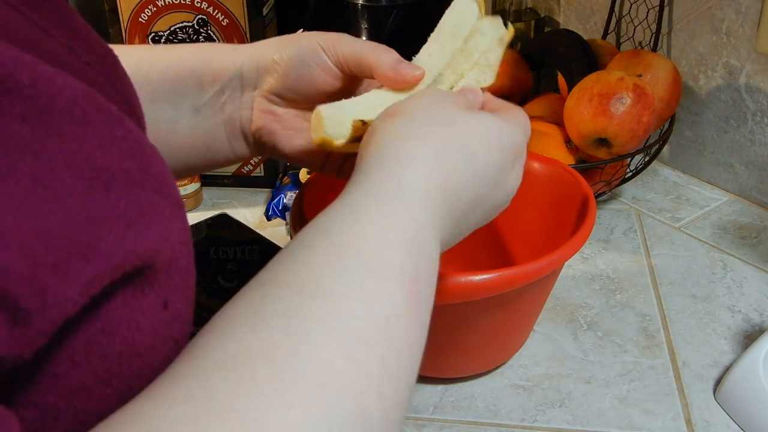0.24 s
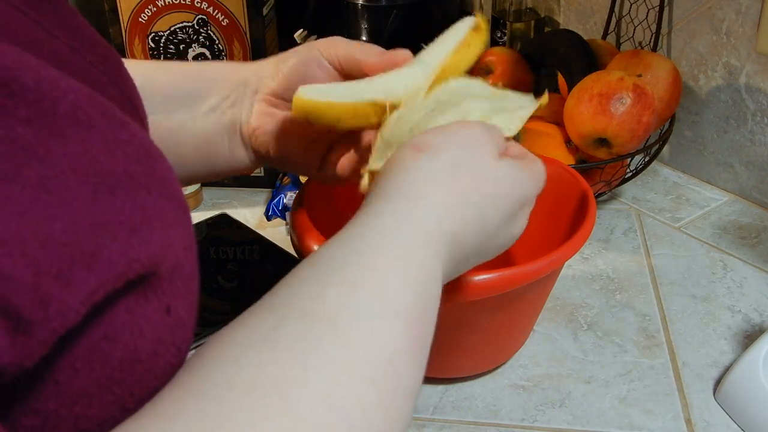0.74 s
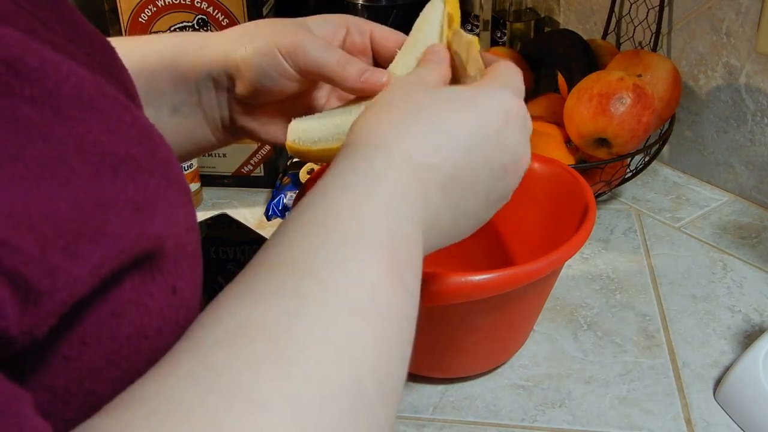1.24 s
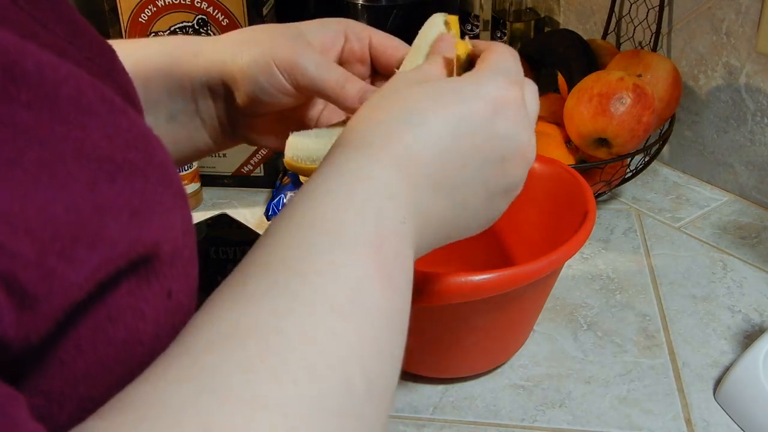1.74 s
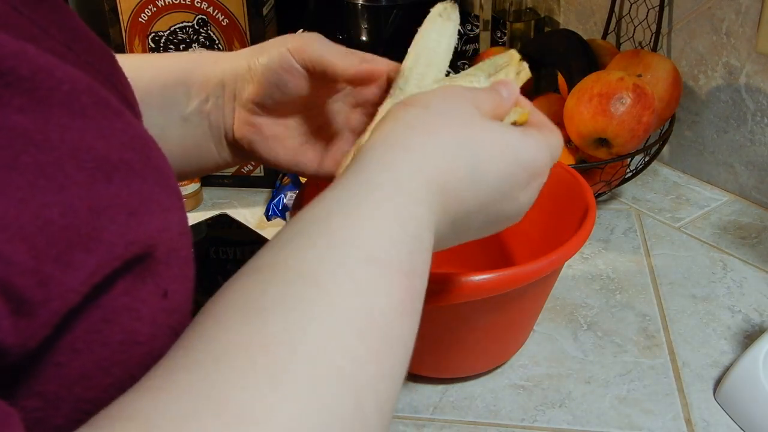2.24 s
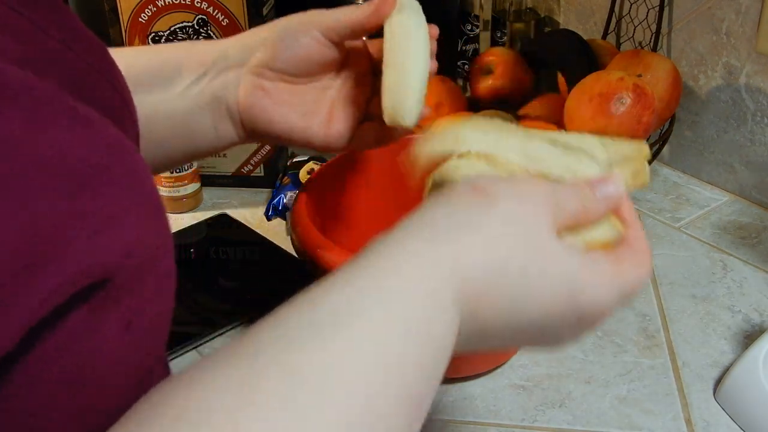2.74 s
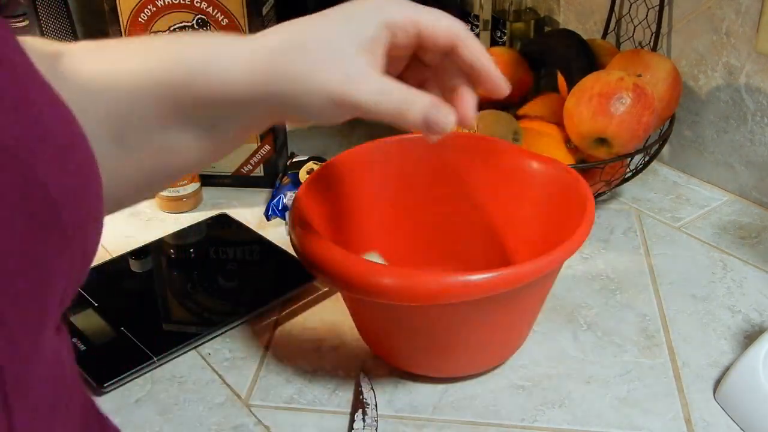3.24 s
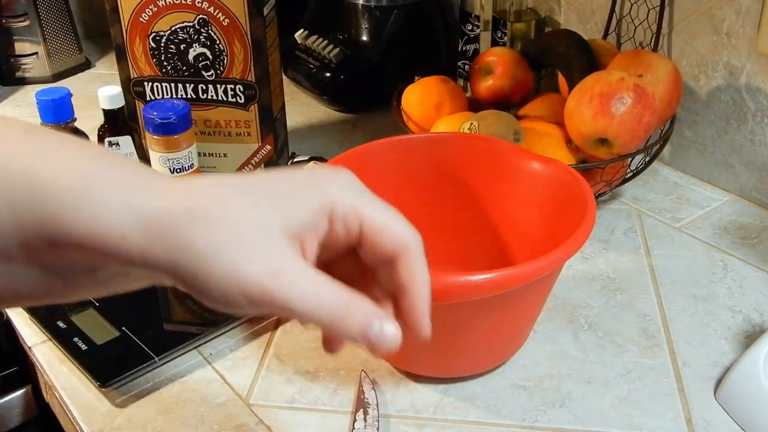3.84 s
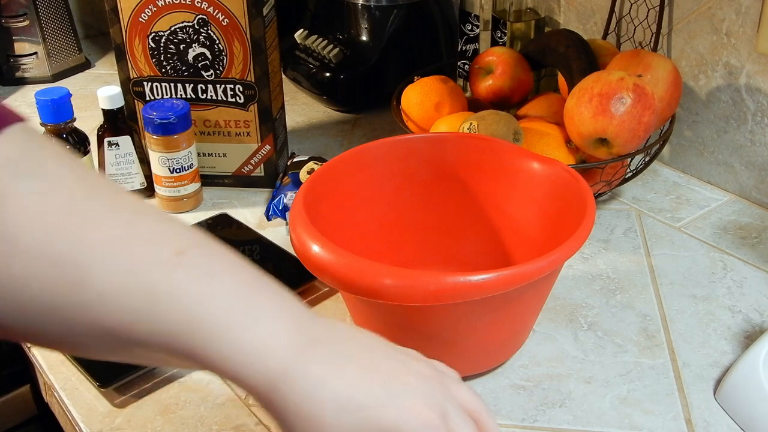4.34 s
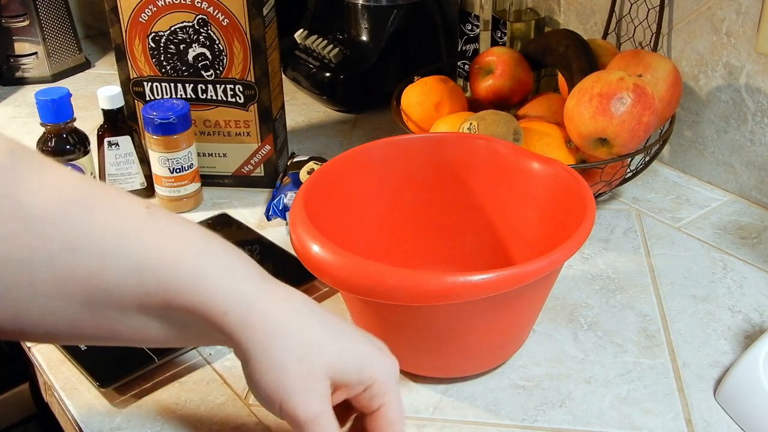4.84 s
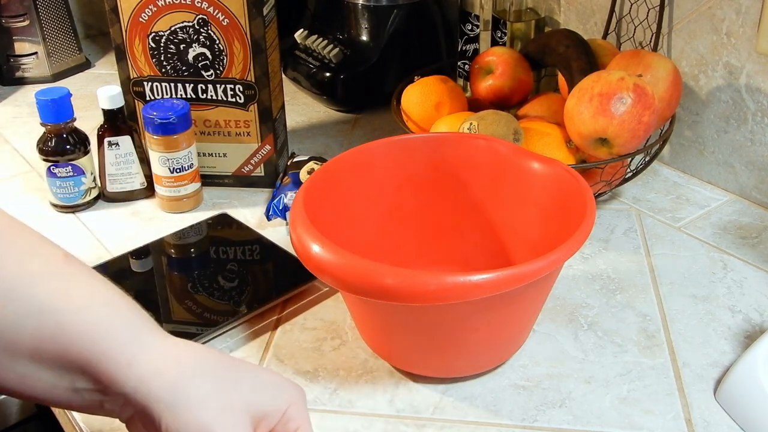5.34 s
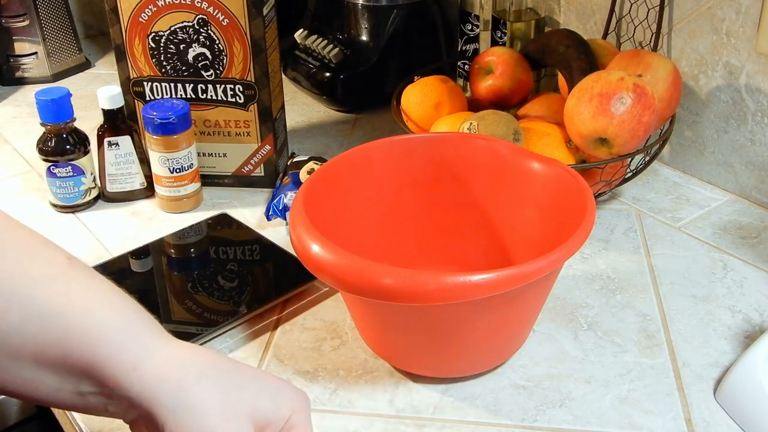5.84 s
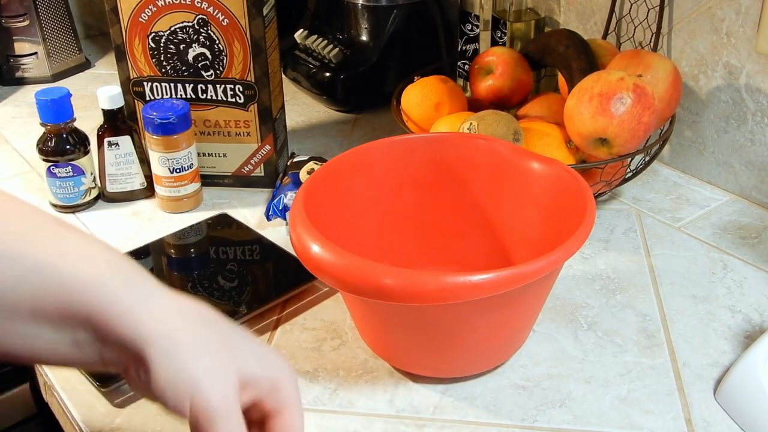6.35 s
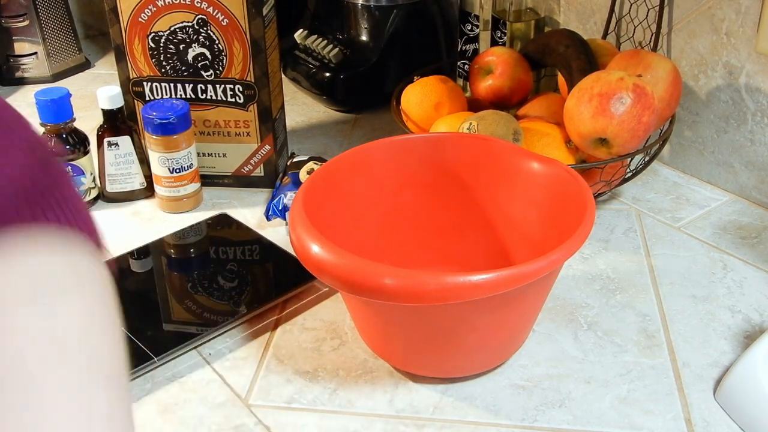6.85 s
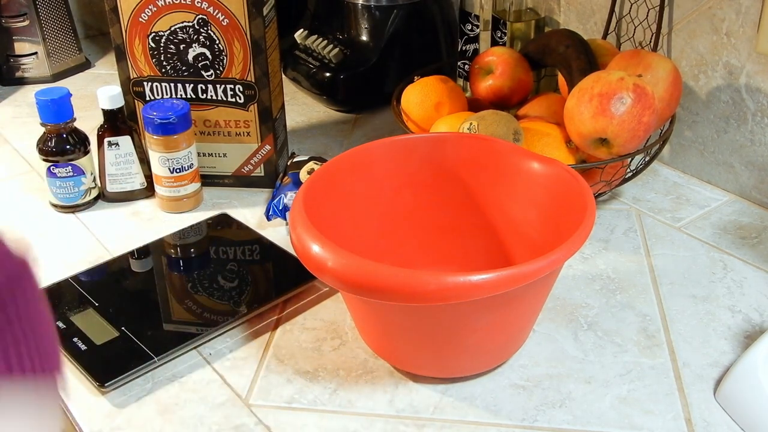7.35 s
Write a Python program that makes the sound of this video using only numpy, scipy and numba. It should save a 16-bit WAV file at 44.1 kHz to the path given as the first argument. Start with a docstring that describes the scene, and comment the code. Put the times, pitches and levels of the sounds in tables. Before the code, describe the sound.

Close to a small microphone on a kitchen counter, peel barely rustles over soft room tone and hum. One soft double bump in the bowl, then a sudden hard knock, rustling and mid-pitched plastic snaps. It falls quiet, a tight burst of piercing cracks follows, then near the end a double heavy thud on bowl, counter or bin, with brief room reflections.

```python
"""Hands peel fruit over a plastic bowl on a tiled kitchen counter, close to a small camera.
Faint rustles of skin and bag, as buckling creases, open over room tone (noise bands) and a fridge hum (tones).
Near 3.3 s soft blows excite bowl, counter and bin modes; 4 to 5 s brings louder blows, rustles and film snaps.
Sharp snaps, as bursts of narrow-band noise, crowd 6.1 to 6.4 s, and the heaviest thuds land near 7.4 s.
Hard walls give each near sound a short tail of decaying noise."""
import sys
import numpy as np
from scipy import signal
from scipy.fft import rfft, irfft
from scipy.io import wavfile
from scipy.ndimage import uniform_filter1d
from numba import njit

SR = 44100
rng = np.random.default_rng(int(sys.argv[2]) if len(sys.argv) > 2 else 0)


def generate_wav(signal):
    """Clip the signal to [-1, 1] and save it as 16-bit WAV at the path in sys.argv[1]."""
    frames = np.transpose(np.atleast_2d(signal))
    scaled = np.clip(frames, -1, 1) * 32767
    pcm = np.round(scaled).astype(np.int16)
    wavfile.write(sys.argv[1], SR, pcm)


N = 335160  # length [samples]


def undb(db):
    """Amplitude ratio of a level: 20 dB is a factor of ten."""
    return 10 ** (np.asarray(db) / 20)


def unit(x):
    """Normalise to a root-mean-square value of 1."""
    return x / np.sqrt(np.mean(x ** 2))


def panned(x, pan_db):
    """Interchannel level difference: left minus right is pan_db."""
    return x * undb(np.array([[.5], [-.5]]) * pan_db)


def add(out, s, x):
    """Superposition: mix x into out from time s [s]."""
    i = int(s * SR)
    out[:, i:i + x.shape[1]] += x[:, :N - i]


def coloured(x, gain):
    """Zero-phase filtering: multiply the spectrum by a function of frequency [Hz]."""
    size = x.shape[-1]
    f = np.arange(size // 2 + 1) * SR / size + 1  # the 1 Hz offset avoids division by zero
    return irfft(rfft(x) * gain(f), size)


def highpassed(x, hz):
    """Second-order Butterworth high-pass: 12 dB per octave below hz."""
    return signal.sosfilt(signal.butter(2, hz, "high", fs=SR, output="sos"), x)


def walk(rate):
    """Random signal of spread 1: held noise, new rate times a second, smoothed twice."""
    k = int(SR / rate)
    held = np.repeat(rng.standard_normal(N // k + 1), k)
    return unit(uniform_filter1d(uniform_filter1d(held, k), k)[:N])


@njit
def grains(start, hz, cycles, size, n):
    """Damped free vibration: each grain is a decaying sine with its own size in each channel."""
    out = np.zeros((2, n))
    for k in range(len(start)):
        # one sample's rotation and decay; amplitude falls by e in the given cycles
        p, z = np.exp((2j * np.pi - 1 / cycles) * hz[k] / SR), 1. + 0j
        for i in range(start[k], min(n, start[k] + int(6 * cycles * SR / hz[k]))):
            z *= p
            out[0, i] += size[k, 0] * z.imag
            out[1, i] += size[k, 1] * z.imag
    return out


def crinkle(lo_hz, hi_hz, rate, cycles, scatter_db, width, bunch):
    """Random buckling: creases snap through at chance moments, and those of one panel share a pitch region."""
    u = rng.random((int(rate * N / SR), 5))
    start = (u[:, 0] * N).astype(np.int64)
    size_db = -scatter_db * np.log(1 - .995 * u[:, 2])  # many small creases, few large
    balance = 1 + width * np.outer(2 * u[:, 3] - 1, [1, -1])  # creases reach the two ports unalike
    size = undb(size_db)[:, None] * balance
    panels = rng.random((8, N // 2048 + 1))  # each panel of film holds its pitch about 50 ms
    panel = (8 * u[:, 4]).astype(int)
    place = panels[panel, start // 2048] + (u[:, 1] - .5) / bunch
    hz = np.minimum(lo_hz * (hi_hz / lo_hz) ** place, .4 * SR)
    x = grains(start, hz, cycles, size, N)
    return unit(coloured(x, lambda f: 1 / (1 + (0.75 * lo_hz / f) ** 8) / (1 + (f / (1.28 * hi_hz)) ** 8)))


def rustles():
    """Summed power of incoherent sources: movements swell, hold and die over four sizes of crease."""
    # movements of skin and bag: (peak [s], time to swell 30 dB [s], hold [s], dying time before scaling [s],
    # level at 2.5-4.5 kHz [dB], then relative to it 1.5-2.5 kHz [dB], 4.5-8 kHz [dB], 8-15 kHz [dB],
    # left minus right [dB])
    movements = [(0.389, -0.15, 0.043, .3, -69, -2, -3.5, -10, -1),
                 (0.472, .08, 0.092, 0.092, -62.5, -9, 4, 2, -2),
                 (0.614, -0.02, 0.041, 0.14, -67, 0, 7, 3, -3), (.7, 1, 0.018, 0.16, -72, -7, 9.5, -4, -2),
                 (0.786, 0.16, .002, 0.11, -63.5, 0, 4.5, -9, -4), (.89, 0.3, .02, .15, -78, -1, 3, -7, -3),
                 (1.055, 0.3, 0.024, 0.12, -81.5, -2, 3, -4, -3),
                 (1.341, 0.01, .016, .13, -48, 3.5, 1.5, -7, 0),
                 (1.975, -0.14, .002, 0.037, -83.5, -8, 8, 8, -3),
                 (2.014, -0.06, .002, .04, -84, -8, 8, 5, -3), (2.19, 0.2, .03, .08, -84.5, -5, 7.5, 3, -3),
                 (2.334, 0, .004, .11, -53, -13, 3.5, -3, 1.5), (2.723, 0, .13, .12, -80, -8, 8, -1.5, -5),
                 (3.264, 0.01, .002, 0.19, -39.5, -10, -18, -36, -1),
                 (3.284, 0.004, .002, 0.11, -36, -6, -8.5, -12.5, -4.5),
                 (3.383, 0.18, .07, .25, -61, -11, 7.5, -2.5, -3.5),
                 (3.636, 0.2, 0.081, 0.58, -76.5, 16, -5.5, -13.5, 0),
                 (3.956, 0.22, 0.075, .3, -66.5, -7.5, 6, -5, -7),
                 (4.033, -0.0121, 0.024, .2, -26.5, .5, -7, -19, 3.5),
                 (4.06, 0.0175, .012, 0.33, -24, 5.5, -2.5, -12, -1.5),
                 (4.238, -0.0352, 0.0021, 0.11, -41.5, -6, -5, -10.5, -5),
                 (4.365, -0.12, 0.0052, 0.096, -48, -5.5, -0.5, -24, -2.5),
                 (4.666, 0.0479, 0.064, .15, -34, 3, -3, -11.5, -2.5),
                 (4.869, .007, 0.024, .08, -38, 8, -7.5, -15, 1),
                 (4.885, 0.0327, 0.0066, .11, -30, -1, 1.5, -2.5, -1.5),
                 (4.967, 0.0341, 0.02, 0.095, -37.5, -2, 0, -5, -0.5),
                 (4.991, 0.027, 0.014, 0.18, -31, -5, 3.5, -3.5, -1.5),
                 (5.198, 0.5, 0.023, .12, -78.5, -3.5, 2, 11, -2),
                 (5.286, 0.15, .02, 0.13, -75.5, -6, 0, 10, -2.5),
                 (5.998, 0.0443, 0.031, 0.23, -36, -31, -4.5, -13, -2),
                 (6.108, 0.1, .015, 0.11, -36.5, -15.5, -8.5, -20.5, -1),
                 (6.141, .03, .04, 0.17, -27.5, -14, -4, -20, -1.5),
                 (6.217, 0.1, 0.045, 0.16, -35.5, -39, -7, -42, -2),
                 (6.326, 0.0641, 0.0017, 0.11, -31.5, -28.5, 3, -30.5, -2.5),
                 (6.338, -0.01, 0.097, 0.21, -25.5, -17, -10, -35.5, -2),
                 (6.94, 0.4, .06, 0.083, -75, 11.5, -18, -32, 0),
                 (7.08, 0.2, .04, .2, -73, 8.5, -10, -26, -1),
                 (7.19, 0, 0.067, 0.24, -74, 10.5, -16, -30, -1),
                 (7.401, 0.002, .01, .1, -41, -8, 1.5, -6, -4),
                 (7.416, -0.003, 0.0095, 0.44, -23.5, 6, -10.5, -18.5, -1.5)]
    # rate of dying of the four crease sizes: (factor on elapsed decay in dB [1]) in the order of creases
    dying_speed = (1.2, 1.23, 1.137, 1.2)
    # above 1 the level curve falls ever faster, as when a noise suppressor closes on a tail
    dying_bend = 1.217
    step = 8  # samples between level values
    creases = np.array([
        crinkle(2500, 4500, rate=4000, cycles=6.7, scatter_db=3.0, width=.35, bunch=8.0),
        crinkle(1300, 2500, rate=3000, cycles=3.6, scatter_db=3.5, width=0.4, bunch=3.0),
        crinkle(4500, 8000, rate=7000, cycles=6.8, scatter_db=3.5, width=0.6, bunch=8.0),
        crinkle(7400, 13400, rate=9000, cycles=5.0, scatter_db=2.5, width=0.9, bunch=1.4)])
    jerks_db = 1.8 * walk(70)  # fibres and folds give way in fits
    t = np.arange(0, N, step) / SR
    power = np.zeros((4, 2, len(t)))
    for s, swell, hold, dying, db, *rest_db, pan_db in movements:
        swell, hold, dying = max(swell, .002), max(hold, 0), max(dying, .01)
        first = max(int((s - 2 * swell) * SR / step), 0)
        span = slice(first, int((s + hold + dying) * SR / step))
        rising_db = 30 * np.minimum(t[span] - s, 0) / swell
        decay = (np.maximum(t[span] - s - hold, 0) / dying) ** dying_bend
        dying_db = -60 * np.outer(dying_speed, decay)
        band_db = db + np.c_[[0, *rest_db]]
        amplitude = undb(band_db + rising_db + dying_db)[:, None]
        power[:, :, span] += panned(amplitude, pan_db) ** 2
    envelope = np.repeat(np.sqrt(power), step, axis=2)[..., :N]
    return np.sum(envelope * creases, axis=0) * undb(jerks_db)


def snaps():
    """Resonance of stiff film: a faint broad crack and a decaying noise band heard as a ring at one pitch."""
    # single snaps: (time [s], peak level [dB], ring frequency [Hz], t60 [s], left minus right [dB])
    cracks = [(0.563, -46, 7400, 0.066, -2.0), (0.617, -45.5, 7300, 0.19, -4),
              (0.6974, -50, 7200, 0.096, -14), (0.7856, -47.5, 3900, 0.08, -1.5),
              (1.3414, -36, 7230, 0.21, 1), (2.3355, -33.5, 3060, 0.12, 6), (3.264, -29, 2200, 0.064, -3.5),
              (3.278, -26, 2300, 0.096, -2), (4.237, -35, 1830, 0.077, -2.5),
              (4.3646, -46, 2280, 0.12, -8.5), (4.5195, -51, 1840, 0.36, 1.5), (4.655, -33, 3700, 0.07, -4),
              (4.6655, -16.5, 2300, 0.074, -1), (4.6902, -18, 2080, 0.069, 2),
              (4.798, -27.5, 2090, 0.052, -3), (4.8877, -17, 2520, 0.06, 0.5),
              (4.973, -25.5, 2500, 0.079, -0.5), (4.9976, -27, 2600, 0.094, 1.5),
              (5.013, -21.5, 6350, 0.051, -3), (5.2932, -45.5, 7200, 0.082, -6),
              (6.095, -31, 4550, 0.11, -5), (6.2888, -23.5, 3830, 0.11, -2), (6.341, -8, 3970, 0.13, -2.5),
              (6.3743, -13, 2950, 0.065, 0.5), (6.4002, -10.5, 3890, 0.091, -1),
              (6.4407, -13.5, 2660, 0.031, -0.5)]
    sharpness = 16  # response halves one sixteenth of the ring frequency away
    out, t = np.zeros((2, N)), np.arange(8192) / SR
    for s, db, hz, t60, pan_db in cracks:
        def spectrum(f):
            ring = 1 / (1 + (sharpness * (f / hz - 1)) ** 2)
            broad = 0.049 / (1 + (1800 / f) ** 6) / (1 + (f / 6000) ** 2)
            return ring + broad

        noise = coloured(rng.standard_normal(len(t)), spectrum)
        x = noise * (1 - np.exp(-t / 0.00035)) * undb(-60 * t / max(t60, .005))
        add(out, s - .001, panned(x * undb(db) / np.abs(x).max(), pan_db))
    return out


def thuds():
    """Modal excitation by impact: one push and a heap of smaller ones drive modes chosen by the object's size."""
    # soft blows: (time [s], peak level [dB], centre frequency [Hz],
    # fall-off away from the centre [dB per octave squared], settling t60 [s], left minus right [dB])
    blows = [(1.337, -30.5, 875, 73, 0.25, -3), (2.851, -33, 206, 20, 0.26, 3),
             (3.261, -15.5, 425, 14, 0.13, 2.5), (3.278, -19.5, 160, 15, 0.081, -.5),
             (3.309, -44, 218, 16, .099, -8), (3.434, -30.5, 165, 9, 0.13, 2),
             (3.53, -44.5, 160, 25, .15, 2), (3.62, -41.5, 245, 26, 0.13, 0),
             (3.877, -34.5, 258, 18, 0.12, 4), (3.953, -43.5, 315, 17.5, .2, -4),
             (4.032, -1, 861, 10, .3, 3.5), (4.044, -14.5, 277, 15.5, 0.2, 6),
             (4.055, -4.5, 777, 11, 0.27, -1.5), (4.067, -11.5, 268, 14, 0.2, 0),
             (4.367, -46, 272, 6, .067, -6), (4.576, -31, 337, 13, .6, -2.5),
             (4.663, -15, 560, 6.5, 0.22, 1.5), (4.689, -13, 555, 17.5, 0.21, 2),
             (4.718, -22, 545, 17, .13, -2.5), (4.769, -34.5, 553, 22, .29, 6.5),
             (4.827, -30, 526, 18.5, .083, 3), (4.876, -23, 582, 23, 0.15, 3.5),
             (6.133, -27.5, 695, 25, 0.17, -3), (6.345, -34.5, 269, 12.5, .2, -4),
             (6.669, -29, 260, 14, .17, -3.5), (6.675, -34, 545, 25, 0.058, -3),
             (7.166, -46, 479, 50, 0.24, -5), (7.398, -17.5, 270, 19, 0.12, 2),
             (7.417, -3.5, 338, 7, 0.14, 2.5), (7.432, 3, 735, -1.5, 0.24, 0),
             (7.49, -21.5, 452, 2, 0.3, 3.5)]
    # modes of bowl, counter and bin: (frequency before detuning [Hz], level [dB], t60 [s])
    body_modes = [(94.7, -3.5, 0.086), (127, -1.5, 0.048), (177, -6, 0.14), (255, 0, 0.074),
                  (296, -3, 0.037), (339, -1, 0.044), (394.5, 1, 0.058), (503, 0, 0.026),
                  (544.4, 4.5, 0.068), (629, 1, 0.048), (720, -2.5, .07), (725, 3, 0.071),
                  (828, 1.5, 0.077), (915, 3, 0.025), (954, -3.5, 0.065), (1040, 4.5, 0.069),
                  (1237, 17.5, 0.019)]
    out, t = np.zeros((2, N)), np.arange(14336) / SR
    hz, mode_db, mode_t60 = np.transpose(body_modes)[:, :, None]
    ringing = np.arange(6144) / SR
    fading = undb(mode_db - 60 * ringing / np.maximum(mode_t60, .01))
    counter = (hz > 150) & (hz < 330)  # the modes that belong to the counter top
    for s, db, centre_hz, slope_db, t60, pan_db in blows:
        # counter shaking: -4 dB for a full-scale blow at 250 Hz, less for small high things and light blows
        weight_db = -4 - 11 * np.log2(centre_hz / 250) + 0.8 * db
        u = rng.random((len(t) + len(body_modes), 2))
        pushes = (u[:len(t), 0] < 700 / SR) * (2 * u[:len(t), 1] - 1)  # about 700 a second
        pushes *= -np.expm1(-t / 0.0068) * undb(-60 * t / max(t60, .01))
        pushes[0] = .8  # first push, where the later ones stay within 1
        detune = 1 + .08 * (u[len(t):, :1] - .5)
        modes = np.sin(2 * np.pi * hz * detune * ringing) * fading
        own = np.sum(modes * undb(-slope_db * np.log2(hz / centre_hz) ** 2), axis=0)
        own = highpassed(own, 0.79 * centre_hz)  # small things radiate little bass
        ring = own + undb(weight_db) * np.sum(modes * counter, axis=0)
        contact = np.hanning(int(.45 * SR / centre_hz))  # a bigger, softer thing pushes longer
        x = signal.fftconvolve(signal.fftconvolve(pushes, contact), ring)[:len(t)]
        x = highpassed(x, 120.)
        add(out, s + .002, panned(x * undb(db) / np.abs(x).max(), pan_db))
    return out


def kitchen(x):
    """Diffuse reverberation: hard walls return a dense tail, shorter and less alike at the ports in the treble."""
    room_db, low_t60_s, high_t60_s = -14, 0.24, 0.073
    t = np.arange(int(.5 * SR)) / SR
    mid, side = rng.standard_normal((2, len(t)))
    noise = mid + np.outer([1, -1], coloured(side, lambda f: np.minimum(f / 6000, 1)))
    low = coloured(noise, lambda f: 1 / (1 + (f / 4500) ** 2))
    tail = low * undb(-60 * t / low_t60_s) + (noise - low) * undb(-60 * t / high_t60_s)
    tail = tail * (t > .004)  # the tail waits 4 ms
    tail = tail / np.sqrt(np.sum(tail ** 2) / 2)
    return undb(room_db) * signal.fftconvolve(x.mean(axis=0)[None], tail)[:, :N]


def room_tone():
    """Noise and tones of varying level: octave bands flicker alone and two hum lines waver quickly."""
    # relative spectrum of the air noise: (frequency [Hz], density [dB per Hz])
    air_spectrum = [(40, -35), (100, -11.5), (160, -4.5), (250, -0.5), (500, -1), (800, -7.5),
                    (1100, -13.5), (1650, -19.5), (1950, -12), (2400, -16.5), (3200, -21), (5000, -28),
                    (8000, -38.5), (15000, -57.5)]
    # course of the room tone: (time [s], level [dB], treble lift from the 4 kHz octave up [dB])
    air_course = [(0, -60.5, 0), (1.0, -60, -0.5), (1.9, -64.5, 1), (2.2, -61, 1), (2.8, -63.5, 0.5),
                  (3.4, -58, 5), (3.899, -55.5, -2), (4.4, -61.5, 0.5), (4.999, -61, 0), (5.6, -63, -1),
                  (6.3, -66, -2.5), (6.599, -58.5, -3.5), (7.6, -57.5, -4)]
    # fridge motor: (mean frequency [Hz], mean level [dB])
    hum_lines = [(188.4, -68.5), (376.8, -69.5)]
    hz_points, db_points = np.transpose(air_spectrum)
    air, t = 0, np.arange(N) / SR
    s, *columns = np.transpose(air_course)
    level_db, treble_db = (np.interp(t, s, c) for c in columns)
    mid, side = rfft(rng.standard_normal((2, N)))
    f = np.arange(len(mid)) * SR / N + 1
    difference = side * np.clip(0.3 + 25 / f + f / 9000, 0, 1)  # how unalike the channels are
    both = mid + np.outer([1, -1], difference)
    both = both * undb(np.interp(np.log(f), np.log(hz_points), db_points))
    for octave in range(5, 15):  # centres at 2 ** octave Hz
        overlap = np.cos(np.pi / 2 * np.clip(np.log2(f) - octave, -1, 1)) ** 2
        band = irfft(both * overlap, N)
        flicker_db = 2.2 * walk(14)
        air = air + band * undb(flicker_db + treble_db * np.clip(octave - 11, 0, 1))
    hum = 0
    for hz, db in hum_lines:
        amplitude = np.sqrt(2) * undb(db + 1.8 * walk(33))
        wavering_hz = hz + 4.0 * walk(23)
        hum = hum + amplitude * np.sin(2 * np.pi * np.cumsum(wavering_hz) / SR)
    return unit(air) * undb(level_db) + hum * undb(level_db - level_db.mean())


def scene():
    """Superposition of direct sound, reverberation and background."""
    near = rustles() + snaps() + thuds()
    return near + kitchen(near) + room_tone()


def record(dry):
    """Transmission chain: a brief level dip, bass cut, notch, clipping at full scale and top cut."""
    dip_s, dip_half_s, dip_db = 6.1235, 0.0049, -29.5
    notch_hz, notch_width_hz, notch_db = 1377, 162, -22  # the microphone chain removes a narrow band
    bass_cut_hz, top_hz = 90, 15750
    dip = np.clip(2 - 2 * np.abs(np.arange(N) / SR - dip_s) / dip_half_s, 0, 1)
    x = highpassed(dry * undb(dip_db * dip), bass_cut_hz)
    x = coloured(x, lambda f: undb(notch_db * np.exp(-.5 * ((f - notch_hz) / notch_width_hz) ** 2)))
    top_cut = signal.ellip(10, .2, 70, top_hz, fs=SR, output="sos")
    return signal.sosfilt(top_cut, np.clip(x, -1, 1))


dry = scene()
out = record(dry)
generate_wav(out)
```